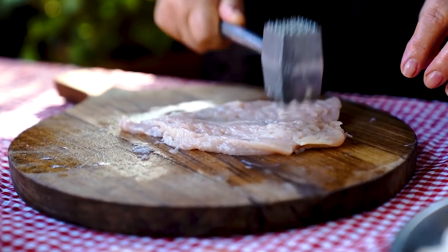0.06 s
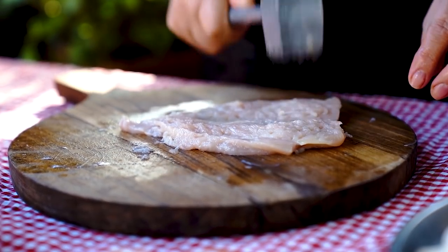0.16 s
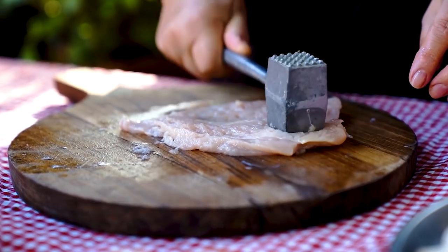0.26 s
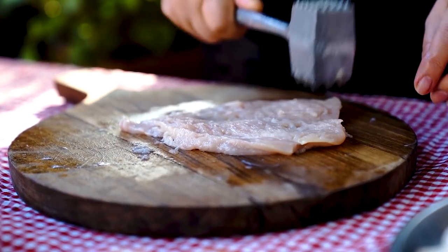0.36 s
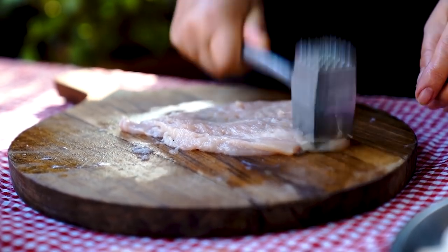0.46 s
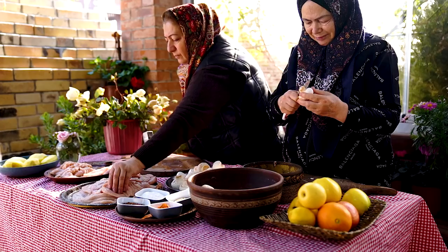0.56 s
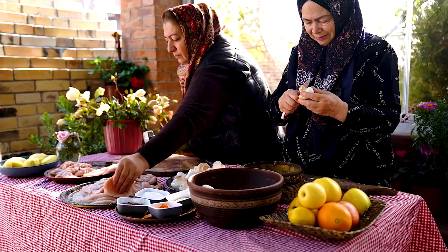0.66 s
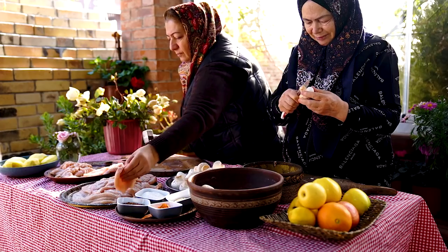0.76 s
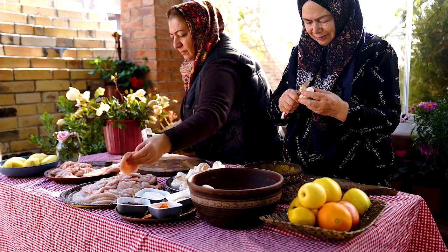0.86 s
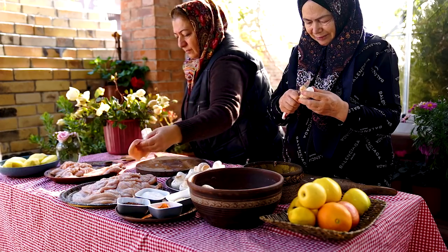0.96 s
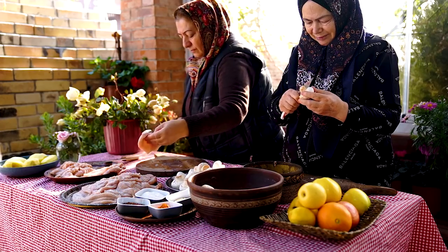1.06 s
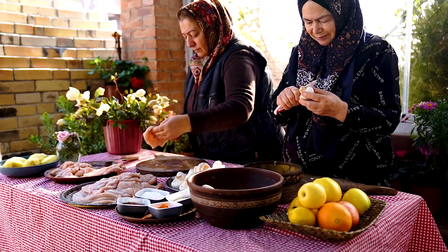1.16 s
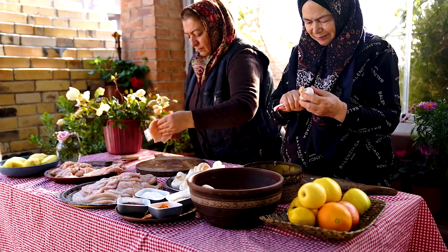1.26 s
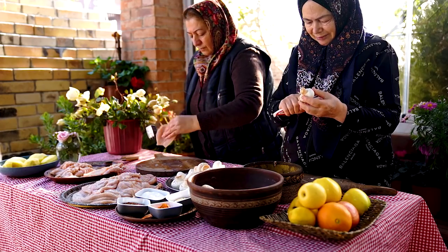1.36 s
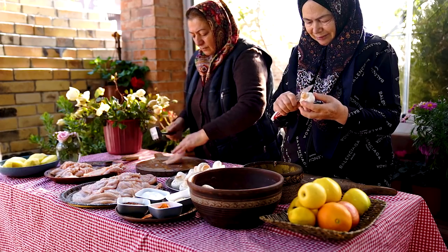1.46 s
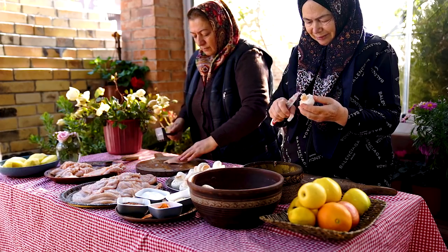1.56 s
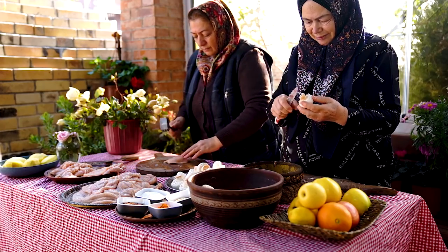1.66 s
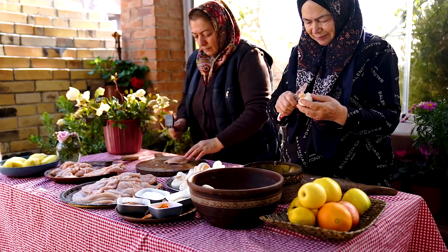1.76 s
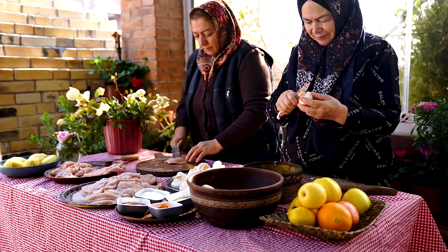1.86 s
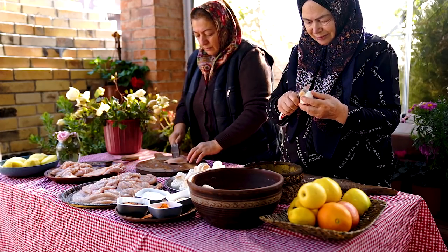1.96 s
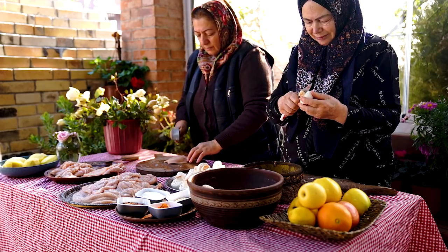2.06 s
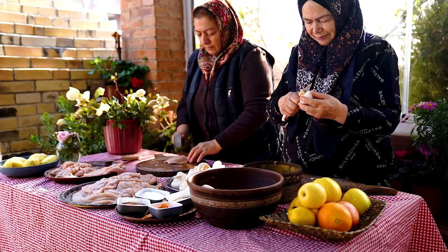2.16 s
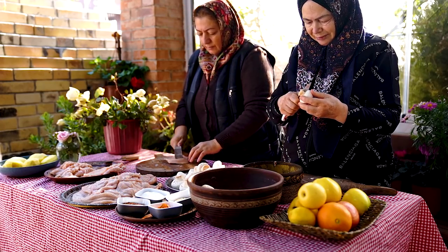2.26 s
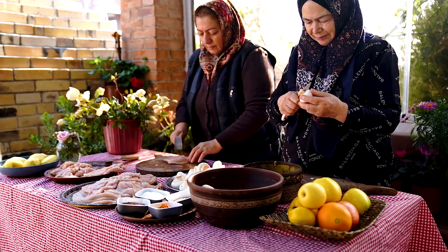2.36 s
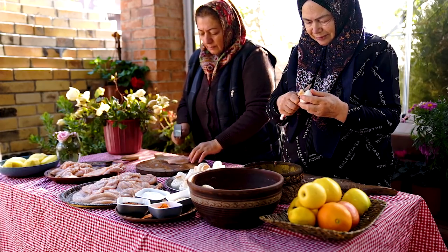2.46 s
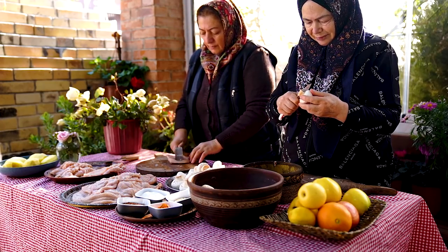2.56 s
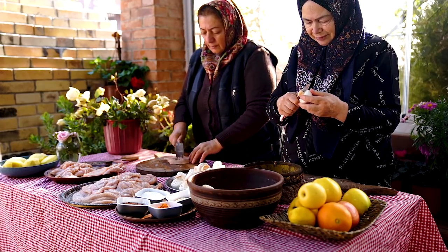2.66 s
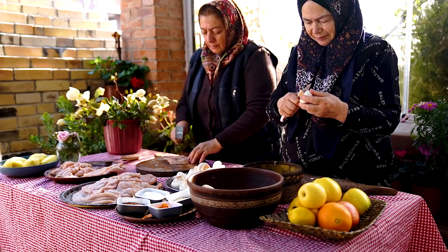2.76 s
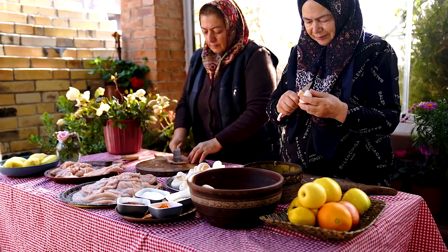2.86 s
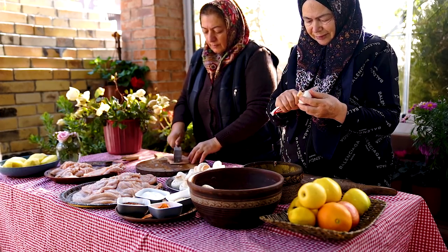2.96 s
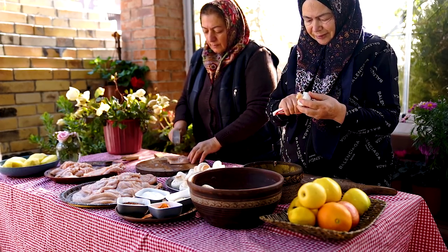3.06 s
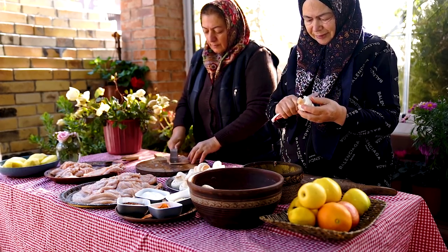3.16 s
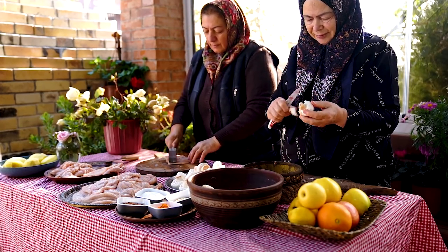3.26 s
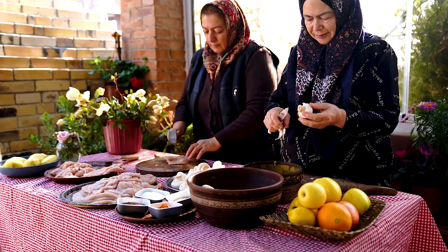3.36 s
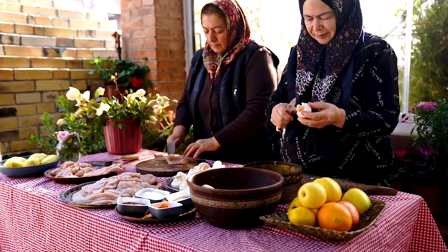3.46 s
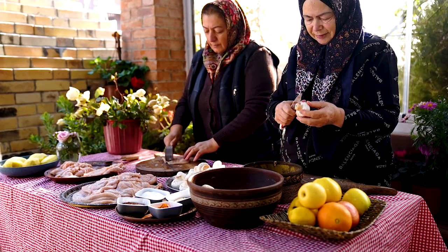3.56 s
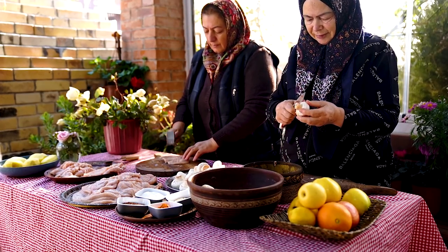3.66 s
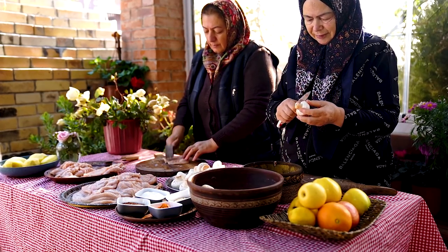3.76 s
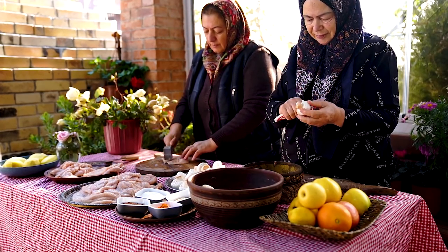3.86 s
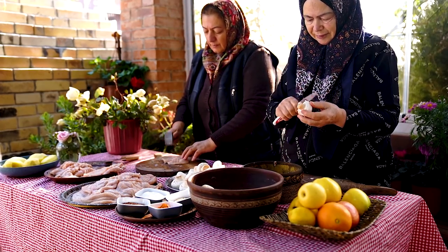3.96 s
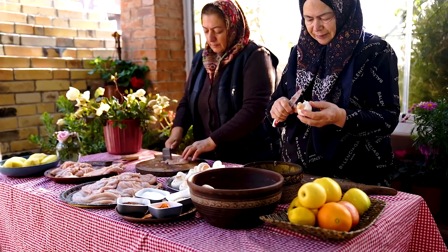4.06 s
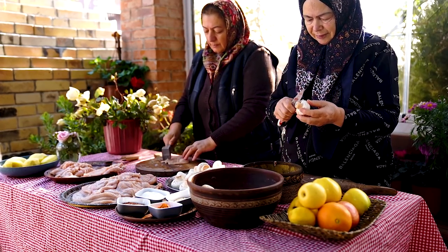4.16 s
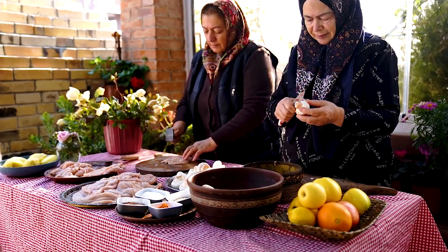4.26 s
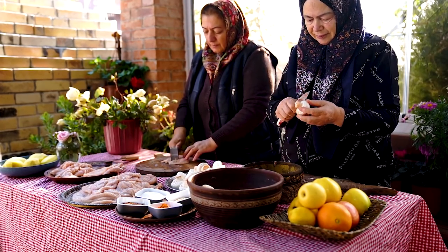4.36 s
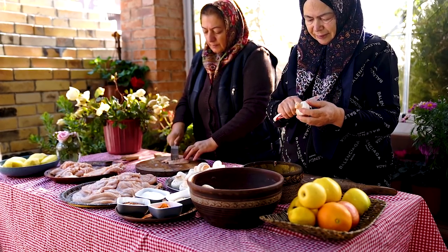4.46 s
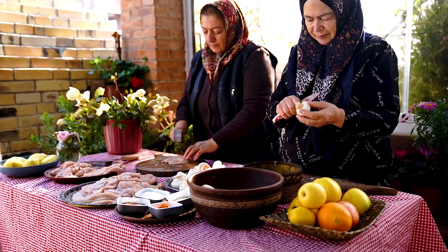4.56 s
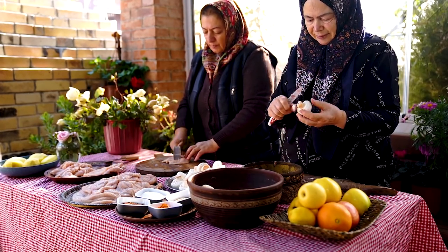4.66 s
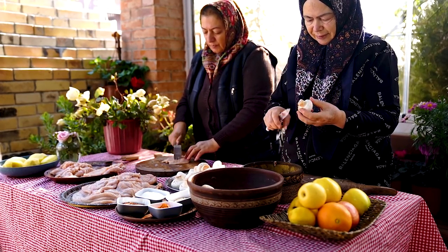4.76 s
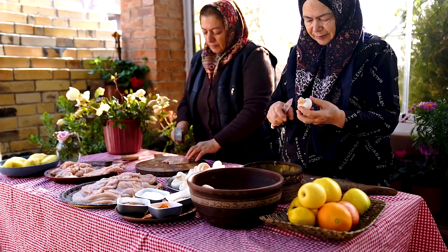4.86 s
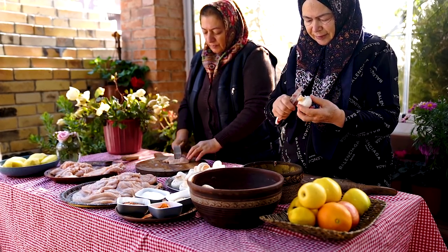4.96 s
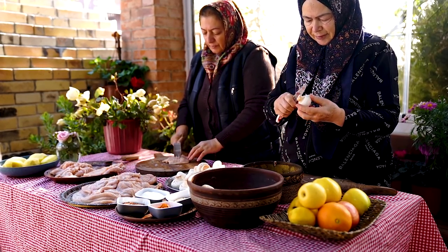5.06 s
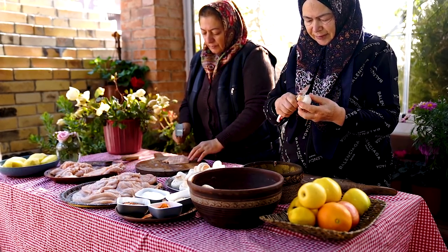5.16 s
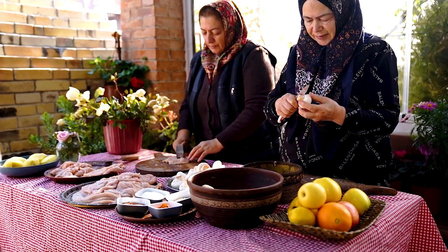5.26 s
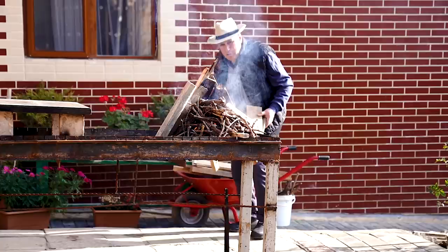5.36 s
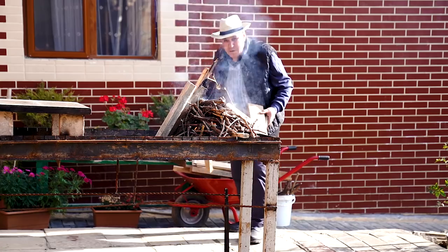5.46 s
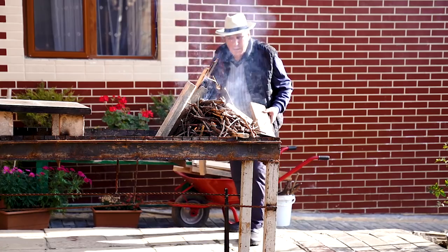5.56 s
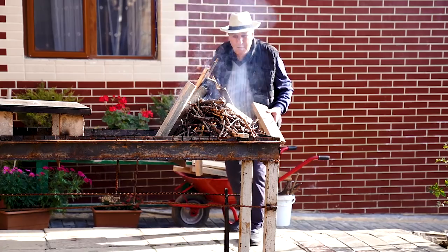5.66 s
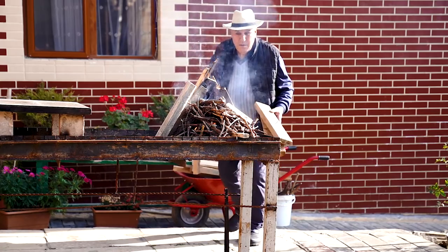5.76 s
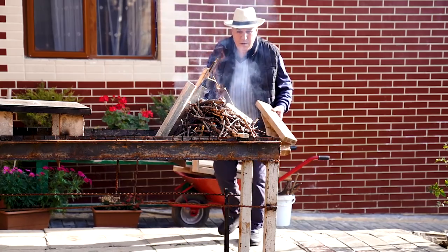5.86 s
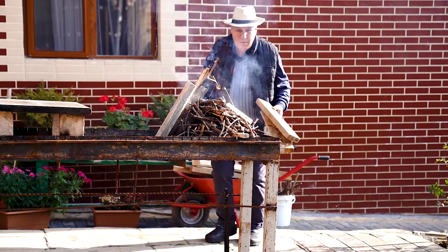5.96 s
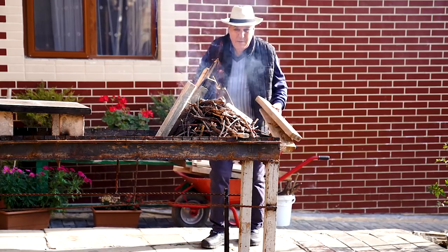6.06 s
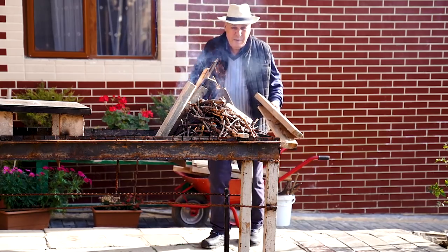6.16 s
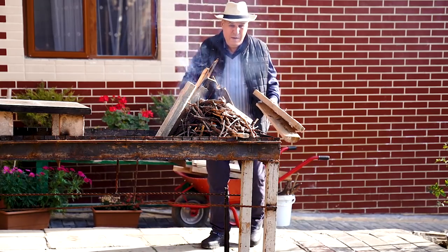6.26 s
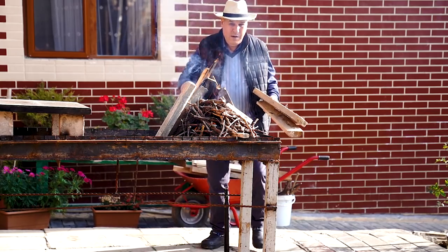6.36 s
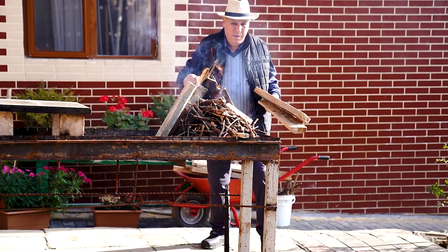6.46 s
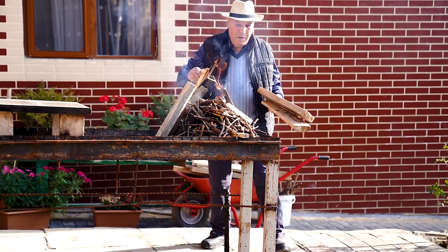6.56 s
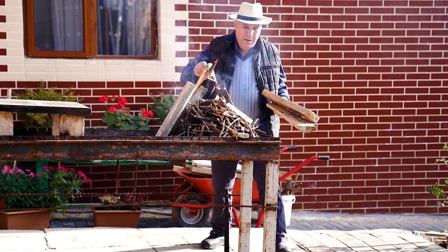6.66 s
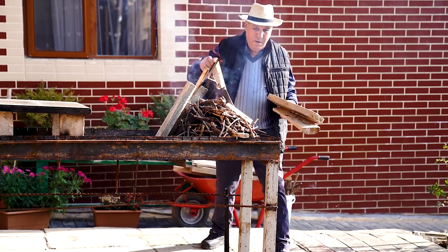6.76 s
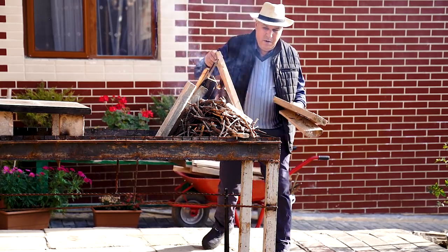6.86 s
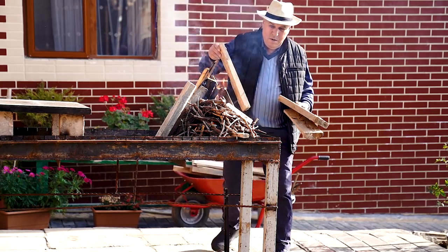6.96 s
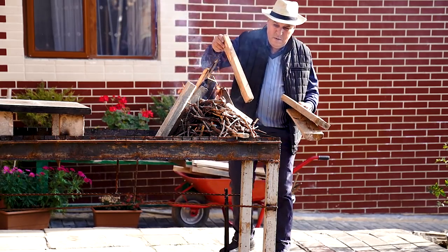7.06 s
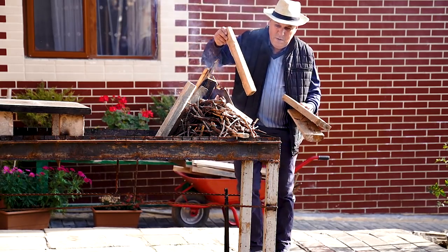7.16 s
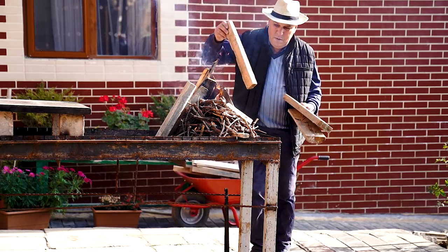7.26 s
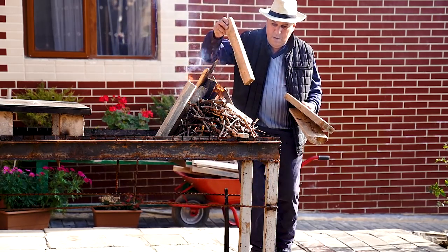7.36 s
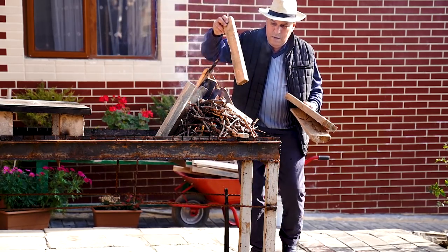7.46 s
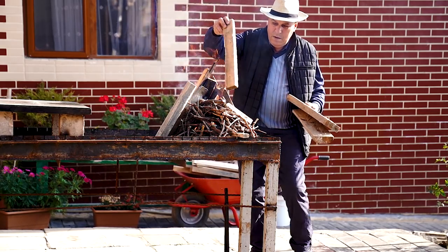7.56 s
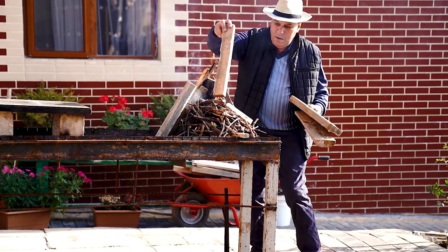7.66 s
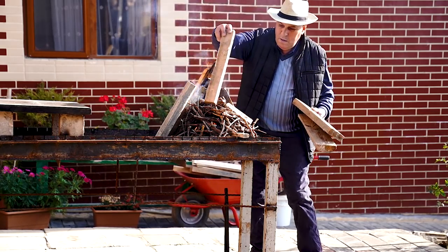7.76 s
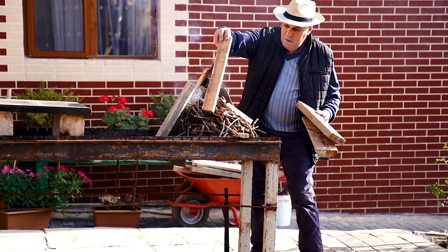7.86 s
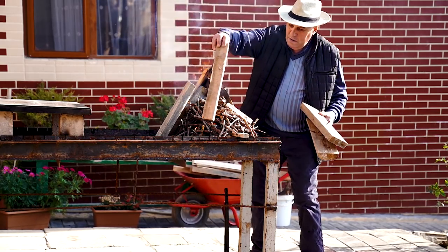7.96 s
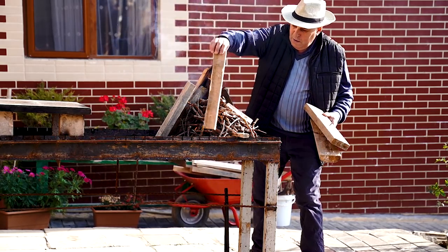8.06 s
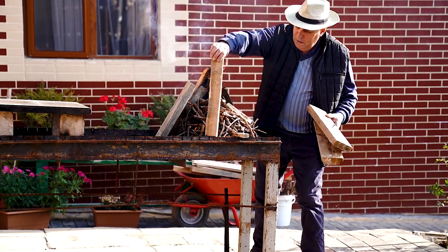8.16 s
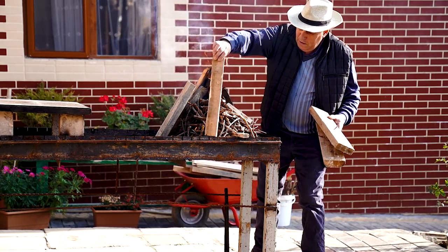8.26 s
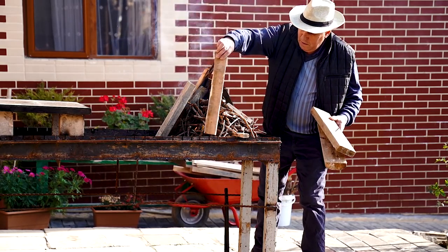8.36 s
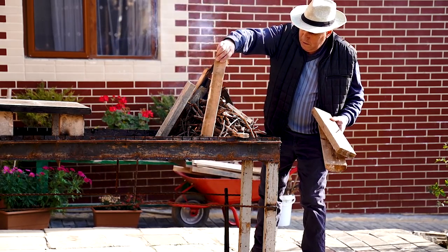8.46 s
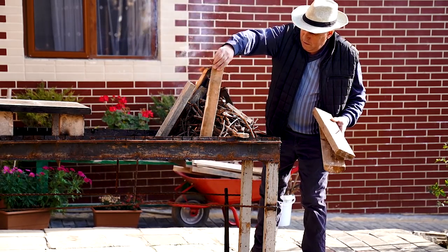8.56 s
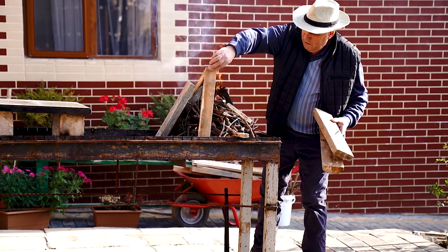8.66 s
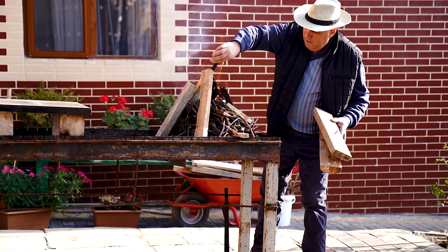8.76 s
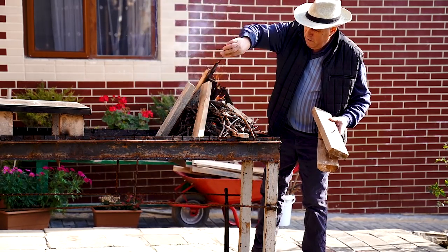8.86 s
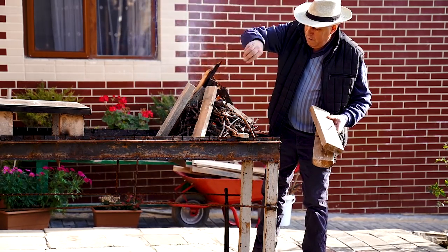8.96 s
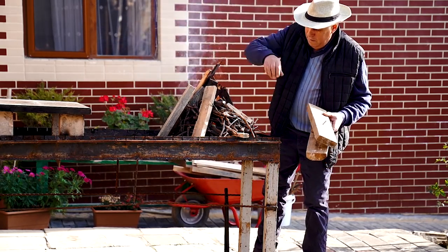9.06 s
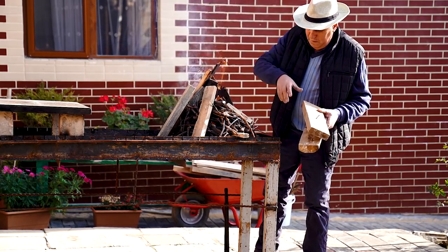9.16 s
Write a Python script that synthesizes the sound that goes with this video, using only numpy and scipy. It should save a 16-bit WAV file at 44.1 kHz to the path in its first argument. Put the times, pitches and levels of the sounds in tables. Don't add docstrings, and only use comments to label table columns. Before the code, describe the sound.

Three heavy, close mallet thuds on thin meat open the scene over airy rumble. From a more distant microphone, hard snaps and clicks precede a steady run of blows, some soft and some strong, with crockery rattle and short veranda echo. Small birds peep and trill. Finally, in a brick-walled yard, firewood scrapes, ticks and knocks dully in near quiet, with another faint trill.

```python
import sys
import numpy as np
from scipy import signal
from scipy.fft import rfft, irfft, next_fast_len
from scipy.io import wavfile
from scipy.ndimage import uniform_filter1d

SR = 44100
rng = np.random.default_rng(int(sys.argv[2]) if len(sys.argv) > 2 else 0)


def materialize(psi):
    bounded = np.clip(np.atleast_2d(psi).T, -1, 1)
    quanta = np.round(bounded * 32767).astype(np.int16)
    wavfile.write(sys.argv[1], SR, quanta)


def volts(x):
    e = np.asarray(x, float) / 20
    return 10 ** e


N = 405700

CUTS = [0, .586, 5.427, N / SR]
# start_s [s], thud_peak_db [dB], then knock_db and splat_db [dB re thud], echo_db [dB]
BLOWS = [(0.009, -0.5, -14.5, -15, -2.5), (0.269, -0.5, -19, -16, -6), (0.538, 0, -13, -29, -5),
         (1.93, -1.5, -6.5, -12, 0), (2.261, -19.5, -27, -2.5, 1), (2.595, -16.5, -13, -2.5, -2),
         (2.922, -12, 2, 1, -0.5), (3.241, -16.5, 1.5, -25, 10), (3.551, -19, -29, -4.5, 2.5),
         (3.847, -13.5, -30, -5.5, -1.5), (4.133, -8.5, -13, -4.5, -3), (4.43, -4.5, -17.5, -19, -2.5),
         (4.722, -6, -7, -19.5, -3), (5.021, -3, -10.5, -20.5, -0.5), (5.326, -2, -10, -25.5, -1.5)]


def evened(x):
    return x / np.sqrt(np.mean(x ** 2) + 1e-20)


def read(points, hz):
    f, value = np.transpose(points)
    return np.interp(np.log(hz + 1), np.log(f + 1), value)


def add(mix, s, sound):
    part = mix[round(s * SR):][:len(sound)]
    part += sound[:len(part)]


def seconds(length):
    return np.arange(int(length * SR)) / SR


def bell(hz, octaves, size):
    f = np.fft.rfftfreq(size, 1 / SR) + 1
    off = np.log2(f / hz) / octaves
    return np.exp(-.5 * off ** 2) + 0.051 * np.exp(-.5 * (off / 2.5) ** 2)


def band_noise(count, hz, octaves):
    size = 2 * next_fast_len(max(count, 4096) // 2 + 1)
    spectrum = rfft(rng.standard_normal(size)) * bell(hz, octaves, size)
    return evened(irfft(spectrum))[:count]


def ring(modes, t, detune, spread_db):
    total = np.zeros(len(t))
    for hz, db, t60 in modes:
        stronger, sharper, phase = rng.standard_normal(3)
        decay = volts(db + spread_db * stronger - 60 * t / t60)
        total += decay * np.sin(2 * np.pi * hz * (1 + detune * sharper) * t + 0.49 * phase)
    return total


def click(hz, octaves, like):
    pulse = np.roll(irfft(bell(hz, octaves, 2048)), 128)[:256] * np.hanning(256)
    return pulse * np.linalg.norm(like) / np.linalg.norm(pulse)


def echoes(x, decays, gap, build, channels=1, colour=None, panels=()):
    space_sizes = [0.83, 1.118, 0.88]
    # frequency_hz [Hz], level_db [dB]
    usual_colour = [(60, -10.5), (300, 8.5), (1000, 2), (3000, 1.5), (8000, 0.5), (15000, -4)]
    out = np.zeros((channels, N))
    for start_s, end_s, space in zip(CUTS, CUTS[1:], space_sizes):
        a, b = round(start_s * SR), round(end_s * SR)
        if not x[a:b].any():
            continue
        shape = (channels, SR // 2)
        taps = rng.choice([-1., 1.], shape) * (rng.random(shape) < .1)
        hz, t, z = signal.stft(taps, SR, nperseg=512)
        tint = read(colour or usual_colour, hz)
        for panel_hz, octaves, db in panels:
            tint = tint + db * np.exp(-.5 * (np.log2((hz + 1) / panel_hz) / octaves) ** 2)
        z = z * volts(tint[:, None] - 60 * t / (space * read(decays, hz)[:, None]))
        tail = signal.istft(z, SR, nperseg=512)[1][:, :SR // 2]
        tail *= 1 - np.exp(-np.maximum(seconds(.5) - gap, 0) / build)
        tail /= np.linalg.norm(tail[0])
        out[:, a:b] = signal.oaconvolve(x[None, a:b], tail, axes=1)[:, :b - a]
    return out


def air():
    # frequency_hz [Hz], density_db [dB per Hz]
    air_spectra = [
        [(18, -61.5), (30, -42.5), (125, -2), (200, -19.5), (345, -17.5), (600, -2.5), (740, -19), (1100, -9.5),
         (1600, -17), (2250, -22), (2700, -35), (4500, -38.5), (7000, -47), (16000, -54.5)],
        [(18, -38), (30, -8.5), (149, -1), (266, -11.5), (400, -12), (1460, -17.5), (2600, -19.5), (4800, -23),
         (6550, -35.5), (12000, -39.5), (16000, -34)],
    ]
    # time_s [s], level_db [dB]
    air_levels = [(0, -40), (.58, -40), (.62, -38.5), (1.1, -47.5), (1.5, -47.5), (2.2, -52.5), (3.8, -53),
                  (5.4, -45), (5.449, -56), (7.5, -53), (8.501, -52.5), (9.2, -54)]
    # frequency_hz [Hz], correlation [0 to 1]
    likeness = [(50, 0.99), (500, 1), (2000, .999), (4500, 0.97), (8000, 0.47)]
    frames, hz = N // 256 + 5, np.fft.rfftfreq(1024, 1 / SR)
    a, b, c, d, patches = rng.standard_normal((frames, 513, 5)).T
    patches = evened(uniform_filter1d(uniform_filter1d(patches, 10, 0), 14, 1))
    t = np.arange(frames) * 256 / SR
    same = np.clip(read(likeness, hz), -1, 1)[:, None]
    left, other = a + 1j * b, c + 1j * d
    z = np.array([left, same * left + np.sqrt(1 - same ** 2) * other])
    colours = [volts(read(points, hz)) for points in air_spectra]
    early, late = [colour[:, None] / np.sqrt(np.mean(colour[2:70] ** 2)) for colour in colours]
    z *= np.where(t < CUTS[2], early, late) * volts(1.4 * patches)
    level = volts(np.interp(np.arange(N) / SR, *np.transpose(air_levels)))
    return volts(-26.0) * level * signal.istft(z, nperseg=1024, noverlap=768)[1][:, :N]


def whine():
    # start_s [s], end_s [s], pitch_hz [Hz], level_db [dB rms]
    far_tones = [(.08, .27, 1879, -60), (.31, .535, 2335, -59.5), (.35, .535, 947, -62),
                 (.548, .586, 2950, -43), (.55, .566, 3900, -47), (.7, 1.6, 610, -63),
                 (1.95, 4.5, 947, -65), (1.95, 4.4, 1405, -64), (1.95, 3.9, 1879, -74),
                 (5.62, 6.15, 3644, -76), (6.3, 6.36, 3644, -75), (6.44, 6.62, 3644, -75),
                 (6.66, 6.92, 3644, -76)]
    out = np.zeros(N)
    for start, end, hz, db in far_tones:
        t = seconds(end - start)
        waver = evened(uniform_filter1d(uniform_filter1d(rng.standard_normal(len(t)), 1500), 1500))
        tone = np.sqrt(2) * np.sin(2 * np.pi * hz * t + .4 * waver)
        tone *= volts(db + 2.5 * waver)
        add(out, start, tone * signal.windows.tukey(len(t), .2))
    return out


def note(shape):
    s, hz, db = np.transpose(shape)
    t = s[0] + seconds(s[-1] - s[0])
    quiver = 1 + .01 * band_noise(len(t), 150, 1.0)
    mistuning = 1 + .01 * rng.standard_normal()
    pitch_hz = np.interp(t, s, hz) * quiver * mistuning
    tone = np.sin(2 * np.pi * np.cumsum(pitch_hz) / SR)
    return np.sqrt(2) * volts(np.interp(t, s, db)) * tone * signal.windows.tukey(len(t), .3)


def birds():
    # time_s [s], pitch_hz [Hz], level_db [dB]
    rise_shape = [(-.021, 4100, -12), (-.013, 4700, -7), (-.006, 5250, -11)]
    fall_shape = [(-.003, 5100, -14), (.001, 3700, -16), (.007, 3500, -11), (.014, 3150, -6),
                  (.018, 2900, -9)]
    lead_shape = [(0, 4800, 0.5), (.025, 4110, -14), (.045, 3280, -15), (.06, 3370, -1), (.066, 3900, -8),
                  (.078, 3400, -24)]
    # first_trill_s [s], beat_s [s], trill_db [dB], lead_db [dB]
    phrases = [
        (3.553, .1075, -50, -44.5),
        (8.331, .1095, -52, -51),
    ]
    # start_s [s], length_s [s], from_hz [Hz], to_hz [Hz], level_db [dB]
    peeps = [(1.468, .04, 8100, 7770, -77.5), (2.44, .085, 8100, 7760, -83),
             (4.345, 0.041, 2740, 5030, -54), (4.334, 0.13, 7950, 7600, -85), (6.194, .07, 7550, 7300, -78),
             (6.273, 0.032, 3526, 4030, -70.5), (6.367, 0.065, 7390, 6940, -71),
             (6.546, 0.029, 3395, 4160, -62.5), (7.974, 0.041, 5700, 5780, -60),
             (7.982, .008, 5600, 4300, -64), (8.008, 0.036, 5700, 5430, -59),
             (8.021, .009, 5500, 4100, -61), (8.036, 0.028, 5720, 5760, -64.5),
             (9.002, 0.061, 2100, 4110, -57)]
    # start_s [s], from_hz [Hz], level_db [dB]
    drops = [(.94, 7000, -73), (3.496, 7600, -66), (3.724, 7360, -65), (6.45, 7070, -71),
             (6.585, 7000, -73), (8.29, 6800, -72), (5.27, 6400, -74)]
    song = np.zeros(N)
    for (start, beat, trill_db, lead_db), count in zip(phrases, [7, 6]):
        add(song, start - .198, volts(lead_db) * note(lead_shape))
        for s in start + beat * np.arange(count):
            gain = volts(trill_db + 2 * rng.standard_normal())
            add(song, s + rise_shape[0][0], gain * note(rise_shape))
            add(song, s, gain * note(fall_shape))
    dropping = [(s, .04, hz, .86 * hz, db) for s, hz, db in drops]
    for s, length, from_hz, to_hz, db in peeps + dropping:
        middle = (length / 2, (from_hz + to_hz) / 2, db)
        add(song, s, note([(0, from_hz, db - 10.0), middle, (length, to_hz, db - 7.5)]))
    late = np.roll(song, 3)
    trees = echoes(song, [(1000, 0.38), (8000, 0.32)], gap=0.0051, build=0.00334, channels=2)
    return np.array([volts(4.5) * song, volts(5.5) * late]) + volts(-1.5) * trees


def wood():
    # start_s [s], peak_db [dB], centre_hz [Hz], width [octaves], echo_db [dB]
    snaps = [(.614, 6.5, 2700, .55, -6), (.614, -13.5, 7400, .5, -3.5), (1.539, -28, 2500, 1.2, -6),
             (1.648, -12, 2496, .6, -7), (1.651, -24, 2700, .12, -9.5), (1.764, -1, 2220, .6, -6.5),
             (1.764, -19, 3120, .13, 6.5), (1.764, -27.5, 1650, .16, 4.5), (2.604, -20, 4300, .16, -2),
             (2.86, 0, 2405, 1.5, -7), (2.861, -0.5, 4600, .9, -2), (2.877, -5, 4300, .4, 2),
             (2.927, 3, 1000, .9, -3), (3.24, 6, 1350, .65, -1.5), (3.24, -17, 3900, .35, 3),
             (2.926, -10, 10000, .4, -12), (2.861, -17, 460, .3, 0), (1.541, -28, 1500, .2, -3),
             (5.454, -29, 4330, .23, -5), (7.414, -17.5, 4100, 1.3, 4), (9.039, -18.5, 5000, .8, 9.5)]
    # start_s [s], peak_db [dB], centre_hz [Hz]
    ticks = [(1.385, -59, 5000), (1.548, -25, 9150), (1.566, -46, 9100), (2.546, -55, 4032),
             (3.421, -47, 4970), (4.142, -19, 4900), (4.225, -28, 6000), (4.263, -31, 4000),
             (4.636, -40.5, 3500), (4.732, -22, 4500), (5.002, -33.5, 5000), (5.023, -11, 9500),
             (5.776, -57, 7000), (6.672, -57.5, 8000), (7.102, -60, 7950), (7.222, -29.5, 6540),
             (7.68, -43, 4030), (8.232, -32, 1200), (8.941, -35.5, 6000), (8.39, -46, 8000),
             (8.776, -54, 8000), (9.049, -28, 5000), (0.584, -36, 5000), (2.845, -40, 12000),
             (2.273, -36, 9000), (2.607, -36, 7000), (3.312, -36, 11000), (3.241, -19, 12300),
             (3.56, -34, 11000), (6.31, -60.5, 8970), (.03, -37, 2800), (3.248, -30, 11000),
             (3.83, -35, 2570), (3.855, -27, 1900), (4.439, -24, 2670), (4.448, -30, 6000),
             (5.033, -22, 4300), (5.337, -24, 2650), (5.357, -24, 2610), (8.223, -54, 4500),
             (8.601, -62, 9000), (.285, -30, 2000)]
    # after_blow_s [s], peak_db [dB]
    rebounds = [
        (.032, -30),
        (.061, -33),
    ]
    # start_s [s], level_db [dB rms], centre_hz
    # [Hz], length_ms [ms]
    dull_knocks = [(.614, -34.5, 128, 49), (.616, -27.5, 890, 38), (1.005, -46, 843, 50),
                   (1.645, -44.5, 300, 50), (1.76, -36, 400, 40), (1.54, -49.5, 403, 39),
                   (5.428, -47, 396, 56), (6.033, -51.5, 900, 44), (6.05, -58, 376, 74),
                   (6.125, -50.5, 250, 31), (6.125, -46.5, 1020, 27), (8.222, -37.5, 300, 108),
                   (8.225, -48.5, 862, 116), (8.56, -51, 680, 215), (8.561, -52.5, 1660, 266),
                   (8.95, -38.5, 250, 104), (8.95, -51, 890, 89), (1.935, -41, 70, 90),
                   (2.265, -42, 70, 120), (3.555, -42, 60, 100), (2.93, -30, 400, 90), (1.94, -39, 350, 90),
                   (5.54, -62, 700, 80)]
    # start_s [s], level_db [dB rms], centre_hz [Hz], length_ms [ms]
    rustles = [(1.539, -38.5, 1240, 34), (5.427, -46, 2960, 39), (5.545, -56.5, 7800, 77),
               (5.758, -66.5, 7100, 38), (6.035, -59.5, 8730, 55), (6.105, -48.5, 4510, 55),
               (7.25, -51.5, 1780, 100), (7.744, -55, 3900, 56), (7.76, -56, 1200, 50),
               (8.771, -67, 7730, 33), (8.891, -55.5, 1500, 87), (9.043, -40, 4970, 95),
               (5.003, -50, 2500, 22), (8.402, -64, 10000, 40), (7.215, -62, 9000, 40)]
    # start_s [s], level_db [dB rms], centre_hz
    # [Hz], length_ms [ms]
    scuffs = [(1.465, -44, 1150, 52), (1.48, -67, 4380, 54), (5.54, -46, 2250, 46), (5.54, -45, 4370, 70),
              (5.54, -50, 3337, 73), (7.25, -48, 4320, 63), (7.678, -53, 895, 44), (1.642, -44, 130, 70),
              (1.758, -38, 140, 60), (2.862, -38, 135, 60), (4.636, -55, 3300, 30), (4.95, -64, 3100, 55),
              (5.265, -66, 3100, 50)]
    # pitch_hz [Hz], level_db [dB rms]
    plank_tones = [(737.5, -52.5), (990.5, -54.5), (1470, -51.5), (1669, -54), (1830, -53), (1965, -55)]
    # frequency_hz [Hz], t60_s [s]
    yard_decays = [(100, 0.2), (500, 0.44), (1500, 0.49), (3500, 0.38), (8000, 0.36), (15000, 0.2)]
    dry, sends = np.zeros(N), np.zeros((3, N))

    # start s, peak dB, centre Hz, width octaves, length ms, echo dB
    cracks = [(s, db, hz, octaves, 3.93, echo_db) for s, db, hz, octaves, echo_db in snaps]
    cracks += [(s, db, hz, .75, 2.1, -7) for s, db, hz in ticks]
    for blow_s, *_ in BLOWS:
        for later, db in rebounds:
            if blow_s + later < CUTS[1]:
                cracks.append((blow_s + later, db, 6000, 0.66, 3.6, -21.5))
    for k, (s, db, hz, octaves, ms, echo_db) in enumerate(cracks):
        u = seconds(3 * ms / 1000) * 1000 / ms
        burst = np.exp(-u ** 2) * np.minimum(u * 8, 1)
        snap = volts(db) * 0.34 * burst * band_noise(len(u), hz, octaves)
        add(dry, s, snap)
        add(sends[k % len(sends)], s, volts(echo_db) * click(hz, octaves, snap))

    # table, width octaves, echo dB
    for rubs, octaves, echo_db in [(dull_knocks, 0.66, -11.5), (rustles, 1, -5), (scuffs, 0.18, -8)]:
        for s, db, hz, ms in rubs:
            u = seconds(ms / 1000) * 1000 / ms
            rub = volts(db) * np.sin(np.pi * u ** 0.66) ** 1.2 * band_noise(len(u), hz, octaves)
            add(dry, s, rub)
            add(sends[0], s, volts(echo_db) * rub)

    t = seconds(0.22)
    hum = np.zeros(len(t))
    for hz, db in plank_tones:
        flutter = 1 + .5 * band_noise(len(t), 27, 1.0)
        hum += volts(db) * np.sin(2 * np.pi * (hz * t + rng.random())) * flutter
    add(dry, 8.57, 1.32 * hum * np.sin(np.pi * t / .2))
    return dry + sum(echoes(send, yard_decays, gap=0.00043, build=0.008) for send in sends)


def blow(thud_db, knock_db, splat_db, rattle_db, board, squash):
    # pitch_hz [Hz], level_db [dB], t60_s [s]
    dish_modes = [(1040, -10, 0.17), (2190, -8, 0.1), (2600, -5, .07), (2760, -6, .07), (2930, -7, 0.07),
                  (4300, -16, 0.08)]
    t = seconds(.4)
    soft = np.clip((-thud_db - 9.5) / 3.5, 0, 1)
    board = [(hz, db - 3.7 * soft * np.log2(hz / 190), t60) for hz, db, t60 in board]
    squash = squash + 0.0003 * soft

    thud = ring(board, t, detune=.02, spread_db=1.5) * (1 - np.exp(-(t / 0.0031) ** 2))
    sweep_hz = 350 + 1600 * np.exp(-t / .004)
    knock = np.sin(2 * np.pi * np.cumsum(sweep_hz) / SR + 6 * rng.random())
    knock *= t / 0.0031 * np.exp(1 - t / 0.0031)
    knock += 0.37 * band_noise(len(t), 1100, 0.75) * np.exp(-t / 0.01) * (1 - np.exp(-t / 0.0012))
    chatter = np.exp(0.23 * band_noise(len(t), 120, 0.46))
    rattle = ring(dish_modes, t, detune=0.0053, spread_db=-3.5)
    rattle += 1.6 * chatter * band_noise(len(t), 1300, 0.93) * np.exp(-t / 0.027)
    rattle *= 1 - np.exp(-(t / 0.003) ** 2)
    splat = band_noise(len(t), 3400, 1.0) * (1 - np.exp(-t / 0.00055))
    splat *= np.exp(-t / 0.0012) + 0.052 * np.exp(-t / 0.018)

    bright, deep = np.zeros(len(t)), np.zeros(len(t))
    add(bright, .65 * squash, volts(knock_db) * knock)
    add(bright, squash, volts(rattle_db) * rattle)
    sent = bright.copy()
    add(sent, 0, volts(splat_db) * click(3800, 1.0, splat))
    add(bright, 0, volts(splat_db) * splat)
    add(deep, squash, thud / abs(thud).max())
    fade = signal.windows.tukey(2 * len(t), .2)[len(t):]
    return volts(thud_db) * np.array([bright, deep, sent]) * fade


def mallet():
    # pitch_hz [Hz], level_db [dB], t60_s [s]
    near_modes = [(44.7, -11.5, 0.12), (119, 9.5, 0.029), (185, -6, 0.033), (330, -9, 0.096),
                  (460, -10, 0.066), (720, 3, 0.021), (1108, -22, .05), (1385, -13.5, .04),
                  (2040, -23, 0.058)]
    far_modes = [(72.8, -27.5, 0.46), (119.5, -16, 0.23), (192.3, 7, 0.052), (250, 4, 0.05),
                 (300, -3.5, 0.14), (346.5, -11, 0.15), (415.5, -10.5, 0.14), (473, -9.5, 0.077),
                 (617, -1, 0.05), (770, -11, 0.024), (1000, -14.5, 0.042), (1315, -18, 0.029),
                 (1600, -20.5, 0.043)]
    # frequency_hz [Hz], t60_s [s]
    veranda_decays = [(60, 1), (160, 0.21), (420, 0.47), (1100, 0.36), (2900, 0.36), (7700, 0.27),
                      (15000, 0.33)]
    # frequency_hz [Hz], level_db [dB]
    veranda_colour = [(60, -10.5), (300, 8.5), (620, 3.5), (1000, 1), (2000, 1.5), (3400, 0), (8000, 0.5),
                      (15000, -5)]
    # pitch_hz [Hz], width [octaves], level_db [dB]
    humming_panels = [(300, .1, 2.5), (600, .12, 1), (1100, .1, 1), (2000, .1, 1.5), (2650, .14, 4),
                      (4300, .15, 4.5)]
    dry, sends = np.zeros(N), np.zeros((3, N))
    for k, (s, *levels, echo_db) in enumerate(BLOWS):
        if s < CUTS[1]:
            parts = blow(*levels, rattle_db=-45.5, board=near_modes, squash=.0035)
        else:
            parts = blow(*levels, rattle_db=-25.5, board=far_modes, squash=.006)
        next_cut = min(c for c in CUTS if c > s)
        bright, deep, sent = parts[:, :round((next_cut - s) * SR)]
        add(dry, s, bright + deep)
        add(sends[k % len(sends)], s, volts(echo_db) * (sent + volts(-5.0) * deep))
    lean = volts(-33.0) * signal.lfilter(*signal.butter(1, 300, fs=SR), dry)
    veranda = sum(echoes(send, veranda_decays, gap=0.01, build=0.0022, colour=veranda_colour,
                         panels=humming_panels) for send in sends)
    return dry + np.array([-lean, lean]) + volts(-6.5) * veranda


def scene():
    return air() + whine() + birds() + wood() + mallet()


def roll_off(x):
    return signal.sosfilt(signal.butter(12, 17150, fs=SR, output="sos"), x)


def record(dry):
    thin = signal.lfilter(*signal.butter(2, 32, "high", fs=SR), dry)
    limited = np.tanh(thin)
    edge = signal.firwin(255, 16400, fs=SR)[None]
    mix = signal.oaconvolve(limited, edge, "same")
    return roll_off(mix)


dry = scene()
out = record(dry)
materialize(out)
```